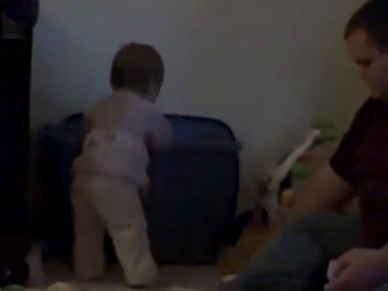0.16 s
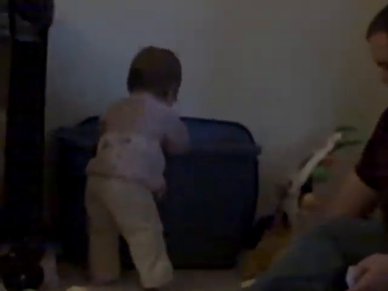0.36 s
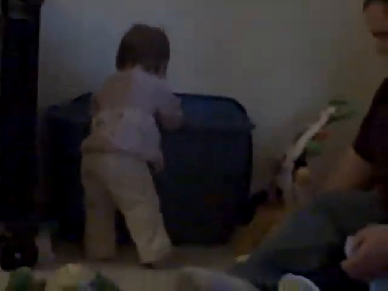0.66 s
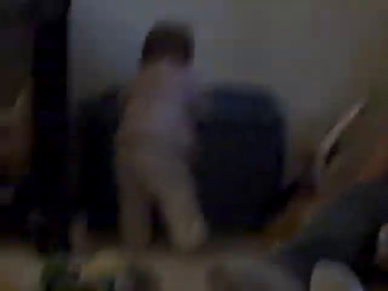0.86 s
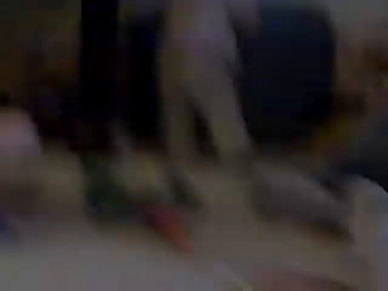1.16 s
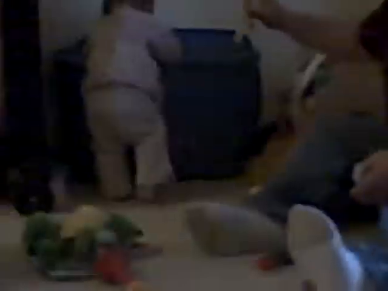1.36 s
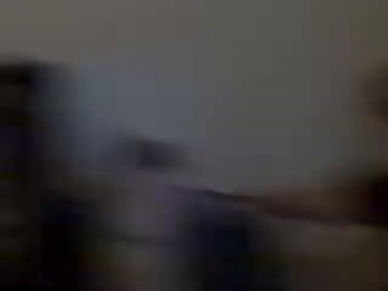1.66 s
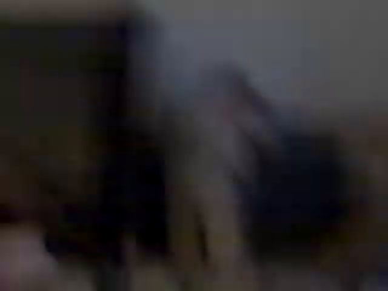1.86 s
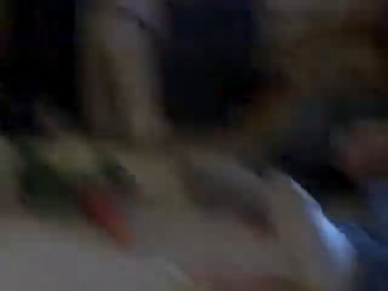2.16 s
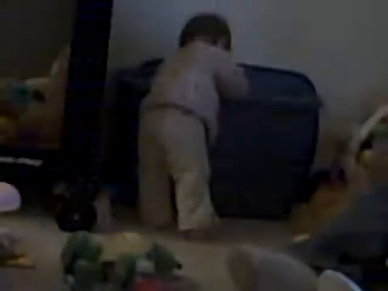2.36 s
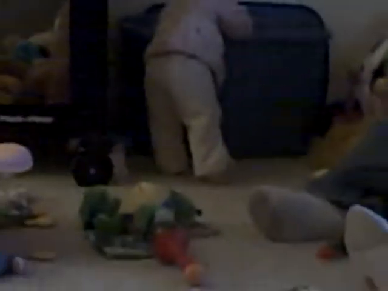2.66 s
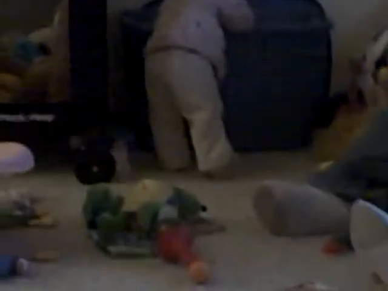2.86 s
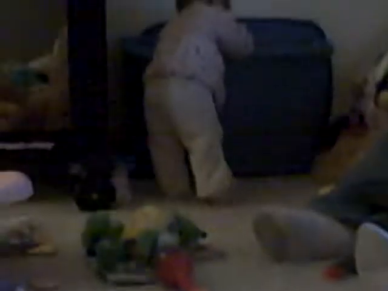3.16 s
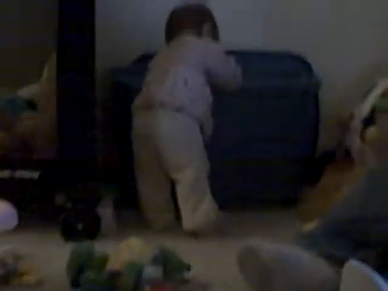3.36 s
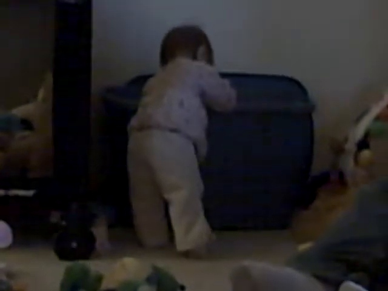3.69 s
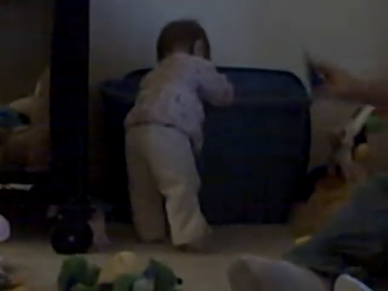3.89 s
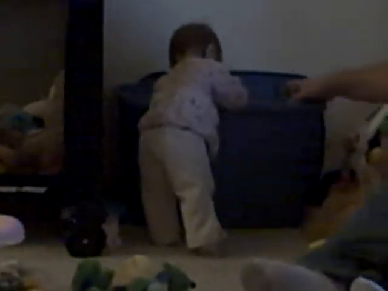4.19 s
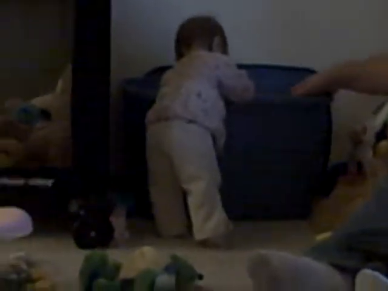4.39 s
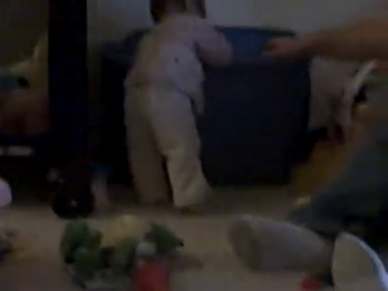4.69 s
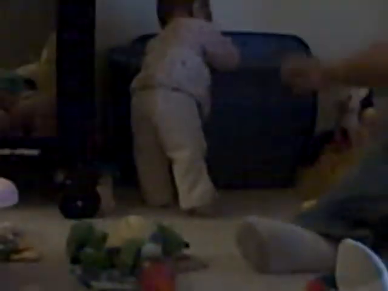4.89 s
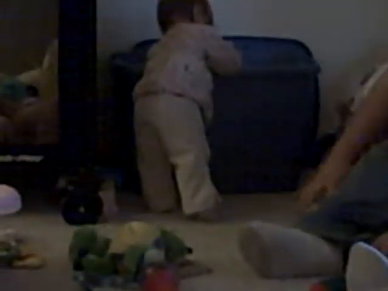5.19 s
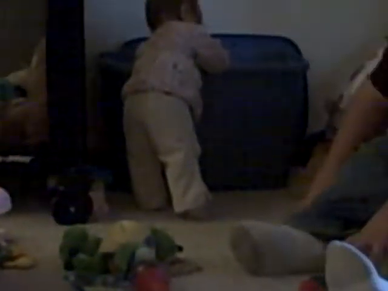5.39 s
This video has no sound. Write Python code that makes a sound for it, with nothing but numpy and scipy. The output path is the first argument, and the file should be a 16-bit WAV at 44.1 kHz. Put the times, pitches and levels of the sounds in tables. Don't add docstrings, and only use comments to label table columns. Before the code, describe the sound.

A handheld microphone hears toys stirred in a plastic tub a short distance away: light clicking first, a pause with close handling taps and cloth rustle, then a dense brittle clatter that thins out. A small hollow tap follows, then near quiet. Late on, a single hard plastic toy slides and lands with the loudest crack, bouncing quickly; a few dull thuds end it over steady hiss.

```python
import sys
import numpy as np
from scipy import signal
from scipy.fft import rfft, irfft
from scipy.io import wavfile

SR = 44100
rng = np.random.default_rng(int(sys.argv[2]) if len(sys.argv) > 2 else 0)


def dump_mix(stems):
    frames = np.atleast_2d(stems).T
    limited = np.clip(frames, -1, 1)
    pcm = np.round(limited * 32767).astype(np.int16)
    wavfile.write(sys.argv[1], SR, pcm)


def gain_from_db(level_db):
    decades = np.asarray(level_db, float) / 20
    return 10 ** decades


N = 244314
T = np.arange(N) / SR

# [t/s, peak level/dB, hardness/dB, rattle length/s]
SMALL_PART_BLOWS = [(0.017, -46, 14, 0.018), (.075, -45, 13.5, 0.0026), (0.0827, -41, -6.5, 0.011),
                    (0.123, -49, 6, 0.008), (0.148, -51, 7, 0.013), (0.206, -44, -3, 0.017),
                    (0.228, -53, -18, 0.018), (0.442, -49, -5.5, 0.016), (0.46, -54, -8, 0.0042),
                    (0.4935, -54, -21.5, 0.004)]
TRUCK_BLOWS = [(1.758, -25, 6, 0.037), (1.772, -25.5, -12, 0.011), (1.798, -23.5, -4, 0.015),
               (1.818, -24.5, -2, 0.012), (1.835, -31, -3, 0.016)]
HEAP_BLOWS = [(1.9654, -41.5, -16.5, 0.012), (1.9833, -26.5, 3, 0.028), (2.0018, -28, 0.5, 0.014),
              (2.0445, -25, -5.5, 0.016), (2.0635, -33, -10, 0.018), (2.0874, -31.5, -3.5, 0.025),
              (2.122, -27, 0, 0.0052)]
CUP_BLOWS = [(2.9302, -31, 4, 0.018), (2.947, -33.5, -4.5, 0.0056)]
DROPPED_BLOWS = [(4.593, -29.5, -5, 0.047), (4.6177, -37.5, -16.5, 0.021), (4.6414, -12, 7.5, 0.012),
                 (4.649, -17.5, 6.5, 0.012), (4.662, -19, 2, 0.012), (4.6734, -21, 2.5, 0.031),
                 (4.7194, -25.5, -5, 0.0044), (4.7637, -38.5, -14, 0.015)]
LATE_BLOWS = [(2.2443, -32.5, -1.5, 0.016), (2.2807, -36.5, -11, 0.0098), (2.2935, -37.5, 2.5, 0.017),
              (2.3433, -34, -7.5, 0.012), (2.3544, -57, 11, 0.009), (2.488, -46, 0.5, 0.0048),
              (2.5405, -45.5, -5.5, 0.015), (2.5644, -55, -3, 0.025), (2.607, -50.5, -4, 0.018),
              (2.8046, -58, -11, 0.0077), (3.0475, -52, -7, 0.017), (3.0914, -51, 1, 0.011),
              (5.2993, -46, -12.5, 0.015), (5.3058, -52, -5, 0.016), (5.3844, -53, 3, 0.016)]
# [t/s, peak level/dB, hardness/dB, rattle length/s]
SLIDE_BLOWS = [(4.522, -42, 1, 0.014), (4.538, -40.5, 4, 0.013), (4.553, -43, 8, 0.0098),
               (4.572, -48, 2, .012)]
# [f/Hz, width/Hz, level/dB]
SMALL_PART_MODES = [(3280, 53, 15), (4720, 46, 4), (7000, 98, 6), (12400, 150, -9)]
TRUCK_MODES = [(700, 130, 6), (1350, 290, 1), (3220, 190, -3), (4750, 64, -14), (6100, 84, -51),
               (7580, 80, -9.5)]
HEAP_MODES = [(800, 100, 2.5), (3270, 80, -11), (3650, 50, -0.5), (4540, 110, -4), (5430, 78, -22),
              (8400, 540, 5)]
CUP_MODES = [(2340, 170, 5), (3595, 44, 0), (3900, 62, -12), (5100, 370, -1)]
DROPPED_MODES = [(1010, 76, 6), (1736, 19, -6), (2082, 42, -7), (2770, 77, -17), (3370, 75, -7),
                 (3920, 38, -10), (4500, 44, -17), (4980, 59, -10.5), (5120, 60, -14), (5470, 48, -15),
                 (6300, 100, -23), (7900, 250, -10), (8800, 130, -10), (10900, 120, -16)]
LATE_MODES = [(620, 62, -0.5), (1000, 450, -5), (1660, 230, -4), (2630, 250, -12.5)]
SLIDE_MODES = [(1074, 67, 1), (1780, 70, -1.5), (3060, 60, -4), (4030, 44, -2), (4350, 90, -8),
               (4900, 60, -11), (5540, 55, -6), (6180, 50, -4), (6420, 81, -1), (8720, 120, -9),
               (9250, 150, -6)]
# [t/s, peak level/dB, f/Hz, t60/s]
SMALL_PART_RINGS = [(.075, -48, 12900, 0.015), (.085, -36.5, 1350, 0.033), (.082, -43, 1990, 0.04),
                    (.128, -43.5, 10080, 0.13), (.148, -42, 7710, 0.079), (.15, -41.5, 7850, 0.14),
                    (.148, -43, 15000, .07), (.204, -42, 8000, 0.1), (.204, -45, 7650, .06),
                    (.225, -48, 8050, .12), (.203, -48, 15000, .05), (.235, -41.5, 11300, 0.012),
                    (.264, -46, 7850, 0.12), (.3, -52, 7950, .1), (.16, -50, 10050, .08),
                    (.445, -52.5, 3140, 0.23), (.447, -53, 5570, 0.092), (.49, -45, 1740, 0.017),
                    (.021, -40, 12400, 0.066), (.022, -41, 8100, .03), (.028, -55, 2300, 0.11),
                    (.061, -50, 9300, .04), (.058, -47, 3270, .05), (.205, -49, 4700, .05),
                    (.212, -53, 3270, .03), (.445, -52, 3900, .05), (.457, -52, 5580, .03),
                    (.488, -49.5, 3370, .04), (.49, -45, 1150, .04), (.955, -55.5, 517, 0.067)]
# [t/s, peak level/dB, f/Hz, t60/s]
SHELL_RINGS = [(1.765, -33, 4930, 0.098), (1.772, -27.5, 2130, 0.026), (1.798, -28, 3230, 0.13),
               (2.005, -27.5, 3900, 0.062), (2.487, -41.5, 780, 0.04), (2.93, -31.5, 1050, 0.065),
               (2.946, -28.5, 1179, 0.16), (2.931, -40.5, 580, 0.14), (2.94, -45.5, 1720, 0.057),
               (2.931, -41.5, 1416, 0.075), (2.99, -43, 1000, 0.17), (2.95, -47, 2552, 0.11),
               (2.97, -51, 2250, .1), (1.76, -35, 5010, .04), (1.985, -35.5, 4100, .06),
               (2.064, -30, 800, 0.055), (2.125, -45, 830, .09), (2.29, -36, 690, 0.083),
               (4.605, -39, 2070, .06), (4.598, -48, 5300, .15), (4.618, -35, 1040, 0.23),
               (4.65, -40, 1766, .3), (4.65, -39, 2300, 0.42), (4.65, -40, 4404, 0.23),
               (4.65, -36, 4899, .24), (4.65, -34, 5066, .23), (4.65, -40, 5297, 0.27),
               (4.65, -37, 6099, .26), (4.66, -45.5, 515, 0.42), (4.462, -52, 1770, .08),
               (5.312, -42, 700, .08), (4.5, -54, 1770, .1), (4.594, -38, 2100, .012),
               (4.655, -44, 5800, .15), (4.645, -36, 720, .12), (2.244, -38, 2600, .03),
               (2.345, -36, 1050, .06), (2.345, -40, 1800, .05), (2.06, -42, 3650, .06),
               (2.047, -36, 5410, .05), (1.772, -39, 1300, .03), (1.79, -38, 6100, .15),
               (1.8, -39, 735, .04), (2.945, -46, 5416, .03), (4.646, -28.5, 1012, 0.31),
               (4.647, -28, 3925, 0.15), (4.646, -33, 5900, 0.24), (4.65, -32.5, 6330, 0.24),
               (4.66, -32, 3370, 0.18), (4.715, -38.5, 1038, 0.34)]
# [t/s, peak level/dB, f/Hz, t60/s]
RUBBED_RINGS = [(.05, -48, 3650, 0.1), (.125, -53, 3650, 0.096), (.17, -57.5, 2830, 0.5),
                (.24, -56, 880, 0.25), (3.05, -52, 940, 0.083), (3.12, -53, 1590, 0.053),
                (3.15, -59, 2430, 0.054), (3.14, -49, 1274, 0.064), (3.2, -66, 1270, 0.2),
                (3.26, -67, 1360, .25), (3.11, -54, 1050, .06), (4.21, -64, 1320, 0.025),
                (4.72, -46, 2350, 0.2), (4.78, -50, 2360, .2), (1.59, -61, 1140, .08),
                (1.62, -60, 1050, .06), (3.09, -57, 833, .1), (4.56, -52, 1076, .1)]
# [t/s, peak
# level/dB, f/Hz, t60/s]
BIN_WALL_THUMPS = [(0.009, -36, 164, 0.025), (0.076, -28, 213, 0.028), (0.121, -47, 207, 0.089),
                   (0.217, -32.5, 220, 0.031), (0.251, -42, 183, 0.065), (0.476, -32.5, 204.3, 0.14),
                   (1.767, -38, 307, 0.045), (1.793, -27, 345, 0.05), (1.8, -23, 258, 0.12),
                   (1.838, -25.5, 166, 0.16), (1.966, -32.5, 252, 0.13), (2.028, -32, 145, 0.17),
                   (2.059, -23.5, 139, 0.055), (2.089, -32, 224, 0.099), (2.129, -44, 203, 0.039),
                   (2.241, -27, 213, 0.045), (2.288, -32.5, 209, 0.053), (2.338, -42, 213, 0.11),
                   (2.535, -40.5, 237, 0.14), (2.793, -51.5, 170, 0.069), (2.932, -48, 258, 0.064),
                   (3.043, -47, 228, 0.1),
                   (4.462, -44.5, 272, 0.071), (4.53, -44.5, 198, 0.15), (4.596, -33, 267, 0.053),
               (4.645, -24.5, 154, 0.12), (4.669, -28, 149, 0.18), (4.754, -33, 155, 0.07),
               (4.789, -32, 153, 0.022), (5.04, -41, 250, 0.066), (5.072, -53, 151, 0.083),
               (5.152, -40, 266, 0.058), (5.314, -34, 178.5, 0.047), (5.33, -36.5, 147, 0.068),
               (5.368, -44.5, 226.7, 0.16)]
# [t/s, level/dB, sharpness/dB, length/s]
SHARP_SNAPS = [
    (2.1986, -43, 5, 0.0039),
    (2.2018, -34, 8, 0.0012),
    (2.218, -29, 8, 0.0012),
]
# [t/s, level/dB, sharpness/dB, length/s]
EDGE_CLICKS = [(0.022, -40, 8, .0015), (0.083, -53, 4, .001), (0.133, -48, 4, .001), (.151, -45, 6, .0012),
               (0.203, -43, 4, .001), (0.218, -46, 2, .001), (.2349, -49, 8, 0.00092),
               (0.443, -53, -2, .001), (1.366, -62, 8, .001), (1.651, -57, 7, .001), (1.718, -58, 7, .001),
               (1.7628, -36, 2, .001), (1.768, -35, 4, .001), (1.774, -36, 4, .001), (1.796, -37, 2, .001),
               (1.818, -35, 3, .001), (1.835, -39, 0, .001), (1.984, -39.5, 2, .001), (1.988, -38, 4, .001),
               (2.005, -29, 6, .0015), (2.0467, -37, 3, .001), (2.056, -36, 5, .001), (2.066, -36, 3, .001),
               (2.122, -38, 6, .001), (2.137, -41, 5, .001), (2.1848, -46, 3, .0015),
               (2.252, -46, 10, .001), (2.291, -38, 6, .001), (2.342, -44.5, 9, 0.0012),
               (2.502, -58, 5, .001), (2.546, -54.5, 2, .001), (4.648, -25, 2, .001), (4.652, -26, 3, .001),
               (4.667, -27, 3, .001), (4.68, -31, 2, .001)]
# [middle t/s, level/dB, crispness/dB, half length/s]
SCRAPES = [(0.844, -66, -6, 0.091), (1.177, -63.5, 2.5, 0.011), (1.308, -74.5, 13, 0.057),
           (1.63, -75, -14, 0.022), (3.134, -62, -8, 0.024), (4.55, -57, 2, 0.021), (5.26, -75, -5, 0.049),
           (5.38, -71.5, -4, 0.097)]
# [t/s, click level/dB, shell thud level/dB, thud f/Hz]
FINGER_TICKS = [(.425, -59, -40.5, 1120), (0.462, -61, -40, 1240), (0.477, -64, -35, 1100),
                (.66, -70, -39.5, 744), (.811, -66, -46, 800), (0.824, -31, -25, 770),
                (0.8265, -53, -26.5, 1420), (1.023, -50, -41, 910), (1.082, -63, -42.5, 920),
                (1.0974, -47, -33, 800), (1.138, -57, -43.5, 700), (1.169, -61, -47, 800),
                (1.193, -60, -44, 840), (1.216, -63, -38.5, 1110), (1.279, -34.5, -40.5, 620),
                (1.542, -46, -47, 1830), (1.651, -51, -44, 500), (1.683, -47, -38.5, 700),
                (2.2432, -46, -27, 1650), (2.25, -40, -31, 1630), (2.283, -44, -38, 1310),
                (2.341, -43, -28, 1000), (2.412, -46.5, -51, 1000), (4.463, -58, -45, 1730),
                (4.594, -52, -34, 1400), (5.307, -46.5, -29.5, 594)]
# [middle t/s, level/dB, f/Hz, half length/s]
HELD_TONES = [(.024, -26, 12400, 0.00064), (0.364, -41, 860, 0.0054), (0.382, -44.5, 867, 0.018),
              (.515, -32.5, 207, 0.012), (0.837, -47.5, 49.5, 0.011), (1.098, -42.5, 50, 0.0049),
              (1.218, -44.5, 47, 0.0056), (1.284, -43.5, 50.6, 0.0066), (1.645, -47, 61, 0.0074),
              (2.065, -48, 94, 0.046), (4.691, -49, 88.4, 0.084), (5.057, -43, 76.5, 0.0091),
              (5.3053, -24, 224, 0.0032)]
# [t/s, movement level/dB, crispness/dB]
RUSTLE = [(0, -52, -12.5), (.2, -63, 6), (.4, -57, -14), (1.08, -67, -5), (1.27, -65, 4), (1.42, -72, -4.5),
          (1.7, -68, 3), (1.95, -56, -11), (2.2, -53, -2.5), (2.4, -56.5, -12.5), (2.68, -67.5, -9),
          (3.1, -60, -15), (3.42, -72, -4.5), (4.399, -74, -0.5), (4.62, -55, -17), (4.9, -68, -6),
          (5.2, -60.5, -14.5), (5.54, -67, -7.5)]
# [f/Hz, level per Hz/dB]
HISS_COLOUR = [(15, 5.5), (35, -5.5), (80, 1), (200, -7), (500, -16.5), (2500, -27), (11000, -36),
               (16500, -34)]
# [f/Hz, rms level/dB]
STEADY_TONES = [
    (118.4, -64),
    (11230, -87),
    (15272, -92),
]
# [f/Hz, t60/s, tail level/dB]
ROOM_TAIL = [(158, 0.54, -23), (500, 0.29, -11.5), (1390, 0.33, -14.5), (3620, 0.33, -9.5),
             (11100, 0.41, -11.5)]


def band(x, lo_hz, hi_hz):
    hi_hz = np.clip(hi_hz, 1.2 * lo_hz, 0.45 * SR)
    return signal.sosfilt(signal.butter(3, [lo_hz, hi_hz], "band", fs=SR, output="sos"), x)


def unit(x):
    return x / np.sqrt(np.mean(x ** 2))


def noise(lo_hz, hi_hz):
    return unit(band(rng.standard_normal(N), lo_hz, hi_hz))


def resonate(x, hz, width_hz):
    b, a = signal.iirpeak(hz, hz / max(width_hz, 5), SR)
    return signal.lfilter(b, a, x)


def burst(s, rise_s, fall_s):
    shape = np.zeros(N)
    start = int(s * SR)
    u = T[start:start + int(12 * fall_s * SR) + 64] - s
    swell = (1 - np.exp(-u / max(rise_s, 1e-4))).clip(0)
    part = swell * np.exp(-u / max(fall_s, 2e-4))
    shape[start:start + len(u)] = part / part.max()
    return shape


def bell(s, half_s):
    shape = np.zeros(N)
    near = slice(max(int((s - 6 * half_s) * SR), 0), int((s + 6 * half_s) * SR))
    shape[near] = np.exp(-np.abs((T[near] - s) / half_s) ** 2.4 / 2)
    return shape


def blows(events, registers, rise):
    out = 0
    for lo_hz, hi_hz, db, tilt in registers:
        force = np.zeros(N)
        for s, peak_db, hard_db, length_s in events:
            force += gain_from_db(peak_db + db + tilt * hard_db) * burst(s, rise * length_s, length_s)
        out = out + force * noise(lo_hz, hi_hz)
    return out


def damped_modes(events, rise_s, wobble, flutter_db):
    drift = np.cumsum(wobble * noise(15, 60)) / SR
    rocking = gain_from_db(flutter_db * noise(20, 110))
    starts = rng.random(len(events))
    out = np.zeros(N)
    for (s, db, hz, t60), start in zip(events, starts):
        shape = burst(s, rise_s, t60 / np.log(1000))
        on = np.flatnonzero(shape)
        own_drift = drift[on + int(start * (N - len(on) - 1)) - on[0]]
        turns = hz * (T[on] - s + own_drift - own_drift[0])
        rocked = shape[on] * rocking[(on + int(start * N)) % N]
        same_energy = np.sqrt(np.sum(shape[on] ** 2) / np.sum(rocked ** 2))
        out[on] += gain_from_db(db) * rocked * same_energy * np.sin(2 * np.pi * turns)
    return out


def toy(events, modes, ring_db, crack_db, flank_db, rise, bright_hz, chatter_db=2.0):
    registers = [(1500, bright_hz, 0, 0), (400, 1500, flank_db, -1), (bright_hz, 14600, flank_db, 1)]
    contact = blows(events, registers, rise)
    contact = contact * unit(gain_from_db(chatter_db * noise(60, 350)))
    top_db = max(db for _, _, db in modes)
    rocking_db = 3 * noise(15, 70)
    starts = rng.integers(N, size=len(modes))
    shell = 0
    for (hz, width_hz, db), start in zip(modes, starts):
        level = gain_from_db(db - top_db + np.roll(rocking_db, start))
        shell = shell + level * resonate(contact, hz, width_hz) * np.sqrt(hz / max(width_hz, 5))
    return gain_from_db(crack_db) * contact + gain_from_db(ring_db) * shell


def toys():
    small_parts = toy(SMALL_PART_BLOWS, SMALL_PART_MODES, ring_db=-14.5, crack_db=-7.5, flank_db=-3,
                      rise=0.34, bright_hz=6840, chatter_db=0)
    truck = toy(TRUCK_BLOWS, TRUCK_MODES, ring_db=-13.5, crack_db=-14.5, flank_db=-8, rise=0.26, bright_hz=6600)
    heap = toy(HEAP_BLOWS, HEAP_MODES, ring_db=-21, crack_db=-12, flank_db=-5, rise=0.35, bright_hz=6450)
    cup = toy(CUP_BLOWS, CUP_MODES, ring_db=-17, crack_db=-17, flank_db=-1, rise=0.34, bright_hz=6800)
    dropped = toy(DROPPED_BLOWS, DROPPED_MODES, ring_db=-17, crack_db=-19.5, flank_db=-4.5,
                  rise=0.23, bright_hz=6200)
    late = toy(LATE_BLOWS, LATE_MODES, ring_db=-16, crack_db=-11.5, flank_db=-3, rise=0.37, bright_hz=4230)
    slide = toy(SLIDE_BLOWS, SLIDE_MODES, ring_db=-19, crack_db=-13.5, flank_db=-1, rise=0.55, bright_hz=7000)
    return small_parts + truck + heap + cup + dropped + late + slide


def rings():
    struck = damped_modes(SMALL_PART_RINGS + SHELL_RINGS, rise_s=0.0011, wobble=0.007, flutter_db=3.5)
    rubbed = damped_modes(RUBBED_RINGS, rise_s=0.031, wobble=0.016, flutter_db=4.5)
    return struck + rubbed


def bin_wall():
    thumps = damped_modes(BIN_WALL_THUMPS, rise_s=0.0039, wobble=0.06, flutter_db=4.5)
    return band(thumps, 71, 3000)


def snaps():
    events = SHARP_SNAPS + EDGE_CLICKS
    s, db, sharp_db, _ = np.transpose(events)
    registers = [(1500, 3700, -7, -0.5), (3760, 9100, -1, 0.17), (9000, 16500, -5.5, 0.87)]
    first_click_db = 6.5
    first = 0
    for lo_hz, hi_hz, share_db, tilt in registers:
        level = gain_from_db(db + share_db + tilt * sharp_db + first_click_db)
        hits = np.zeros(N)
        hits[(s * SR).astype(int) + 8] = level * np.sqrt(SR / (hi_hz - lo_hz))
        first = first + band(hits, lo_hz, hi_hz)
    return first + gain_from_db(-2.5) * blows(events, registers, rise=0.15)


def scrapes():
    grain = gain_from_db(1.3 * noise(24, 260))
    top = noise(5000, 16000)
    top = unit(top + 0.72 * resonate(top, 6400, 700) + 0.2 * resonate(top, 11200, 1500))
    # (voice, level dB, tilt with crispness)
    voices = [(noise(1560, 3560), -4, 0), (noise(560, 1540), 0, -1), (top, 0, 1)]
    out = 0
    for voice, voice_db, tilt in voices:
        stroke = sum(gain_from_db(db + voice_db + tilt * crisp_db) * bell(s, half_s)
                     for s, db, crisp_db, half_s in SCRAPES)
        out = out + stroke * voice
    return grain * out


def finger_ticks():
    tick_s = 0.0015
    thuds = [(s, db, hz, 4.9 * tick_s) for s, _, db, hz in FINGER_TICKS]
    clicks = [(s, db, shell_db - db, tick_s) for s, db, shell_db, _ in FINGER_TICKS]
    shell = damped_modes(thuds, rise_s=0.0002, wobble=0.005, flutter_db=3)
    registers = [(1600, 5500, -2, 0), (5600, 14200, -4.5, 0), (353, 1500, -10, 0.87)]
    return blows(clicks, registers, rise=0.091) - shell


def held_tones():
    return sum(gain_from_db(db) * bell(s, half_s) * np.sin(2 * np.pi * hz * (T - s)) for s, db, hz, half_s in HELD_TONES)


def rustle():
    s, level_db, crisp_db = np.transpose(RUSTLE)
    # (low Hz, high Hz, level dB, tilt with crispness)
    registers = [(298, 1970, -1.2, 0.14), (1900, 6000, -1.7, 0.63), (6400, 15600, 0.49, 1), (123, 370, -2.1, 0.08)]
    out = 0
    for lo_hz, hi_hz, db, tilt in registers:
        movement_db = np.interp(T, s, level_db + db + tilt * crisp_db)
        flicker_db = 1.3 * noise(2.1, 70)
        out = out + gain_from_db(movement_db + flicker_db) * noise(lo_hz, hi_hz)
    return out


def noise_floor():
    hz = np.fft.rfftfreq(N, 1 / SR)
    colour_hz, colour_db = np.transpose(HISS_COLOUR)
    colour = gain_from_db(np.interp(np.log(hz + 1), np.log(colour_hz), colour_db))
    hiss = gain_from_db(-62) * unit(irfft(rfft(rng.standard_normal(N)) * colour, N))
    sway_db = 0.5 * noise(0.75, 23)
    tones = sum(np.sqrt(2) * gain_from_db(db + sway_db) * np.sin(2 * np.pi * f * T) for f, db in STEADY_TONES)
    return hiss + tones


def room(x):
    u = T[:SR // 2]
    build_up = np.clip(u / 0.0052 - 1, 0, 1)
    tail = 0
    for hz, t60, db in ROOM_TAIL:
        fading = noise(hz / 2.28, hz * 1.9)[:len(u)] * np.exp(-u * np.log(1000) / t60) * build_up
        tail = tail + gain_from_db(db) * fading / np.sqrt(np.sum(fading ** 2) * 4)
    return x + signal.fftconvolve(x, tail)[:N]


def scene():
    across_room = room(toys() + rings() + bin_wall())
    close_by = snaps() + scrapes() + finger_ticks() + held_tones() + rustle()
    return (across_room + close_by + noise_floor())[None]


def band_limit(x):
    return signal.sosfilt(signal.butter(12, 16990, fs=SR, output="sos"), x)


def record(dry):
    top_cut = signal.ellip(10, 0.5, 55, 15750, fs=SR, output="sos")
    mix = signal.sosfilt(top_cut, dry)
    return band_limit(mix)


dry = scene()
out = record(dry)
dump_mix(out)
```